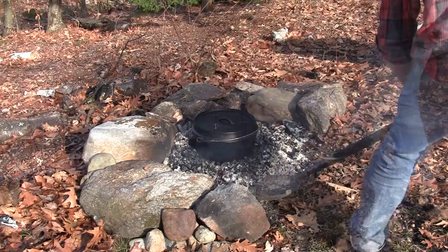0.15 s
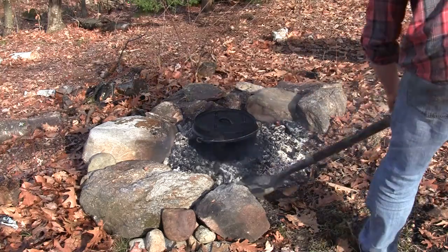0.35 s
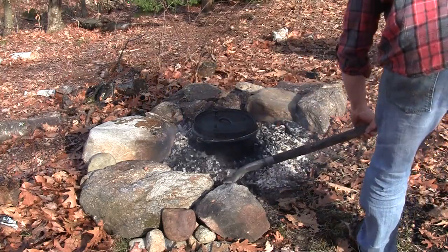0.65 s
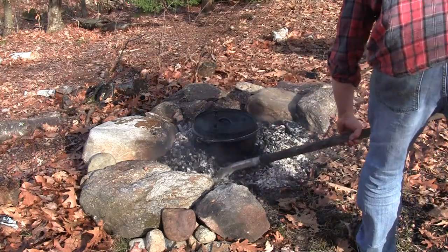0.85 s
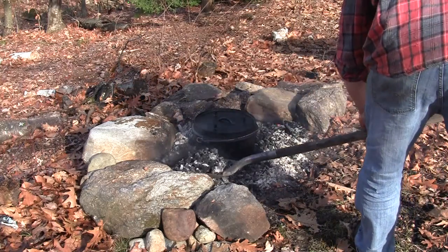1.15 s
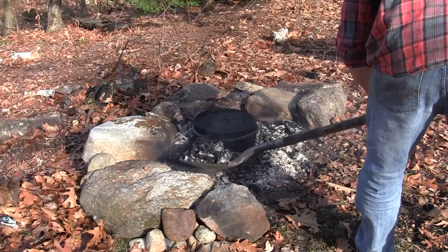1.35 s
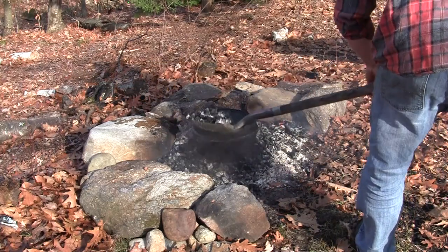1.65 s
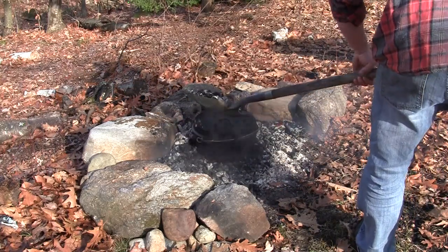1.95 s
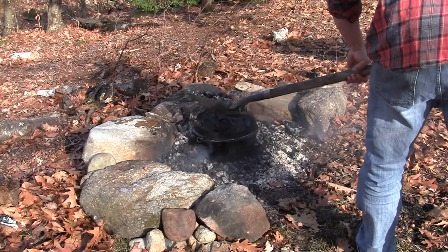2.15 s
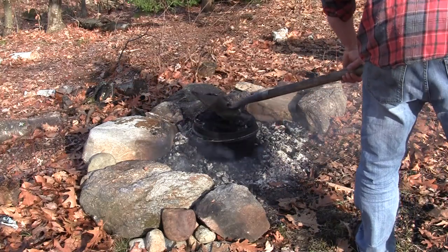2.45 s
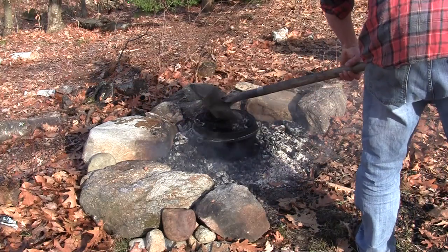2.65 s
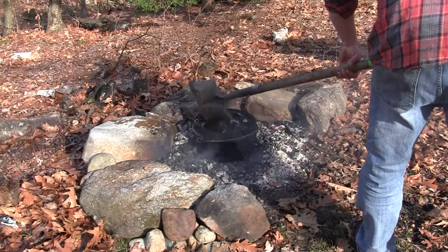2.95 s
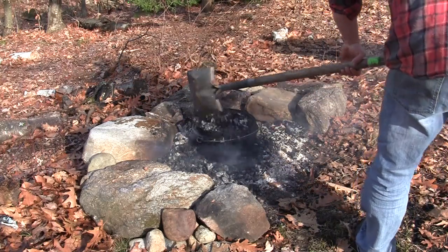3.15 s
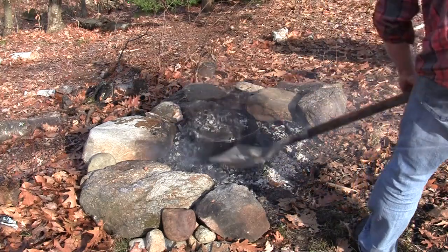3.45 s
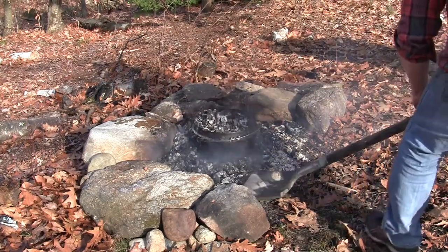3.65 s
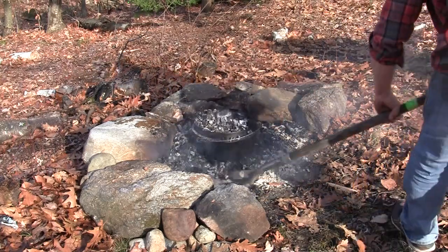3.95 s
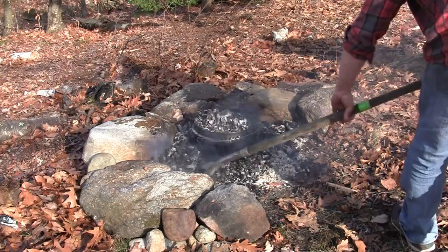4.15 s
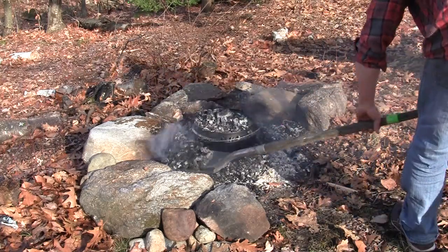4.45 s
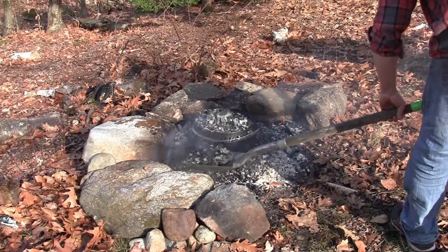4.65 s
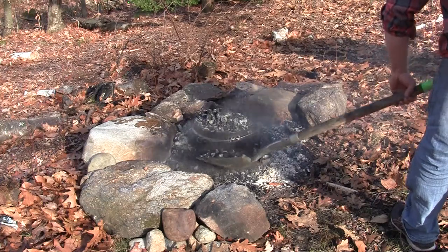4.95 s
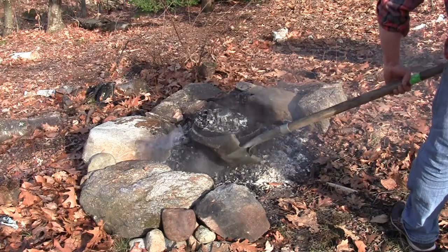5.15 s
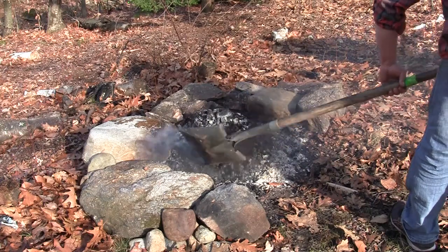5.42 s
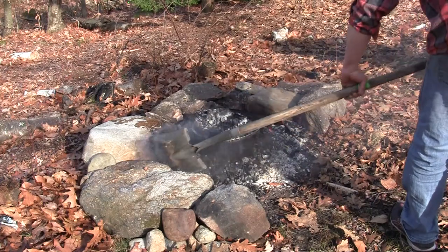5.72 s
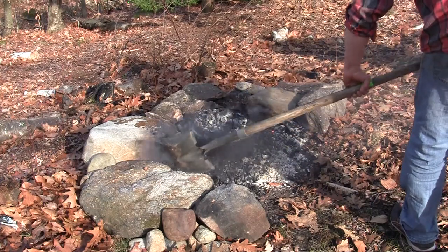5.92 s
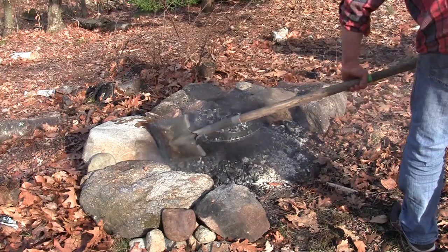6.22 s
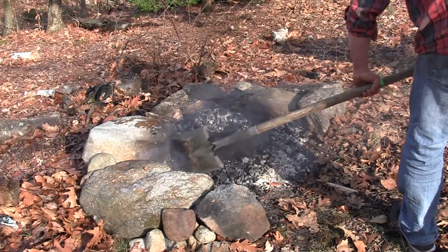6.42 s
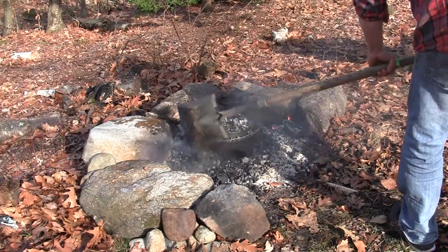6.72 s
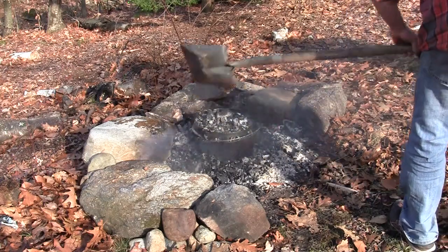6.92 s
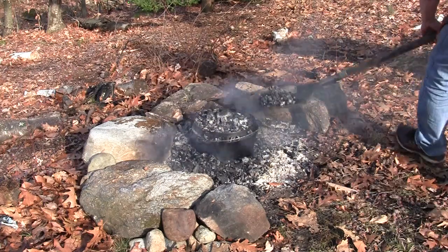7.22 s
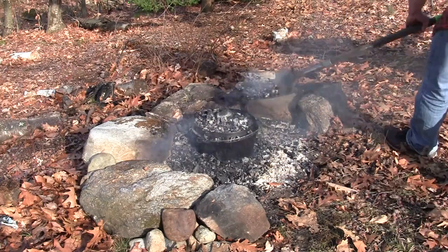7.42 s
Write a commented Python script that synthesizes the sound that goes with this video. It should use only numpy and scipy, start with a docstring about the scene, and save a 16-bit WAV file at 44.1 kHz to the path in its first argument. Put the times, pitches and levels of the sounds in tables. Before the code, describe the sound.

Close outdoor sound of shovelling embers: a brief leaf shuffle, gritty steel scrapes and taps, a quiet lift, then light iron-lid rings and a solid clank with a low thud. The shovel returns, rasping harder through brittle coals with dry snaps. Sharp ringing blows come in two groups near the end, grit trickles away, and boots rustle leaves. Sparse, short echoes and very soft air surround it.

```python
"""Shovelling ash and coals by a fire

A steel shovel scrapes through ash and coals outdoors and tips them onto a cast-iron lid; boots shuffle in leaves.
Grit is dense random clicks and chips, with separate bumps that ring the blade; knocks add a noise crack,
a low thud and decaying blade modes. Falling coals ring the lid modes, dry ticks are short noise bursts,
and sparse echoes surround them. Filtered noise makes the faint outdoor hush and a drone with one thud."""
import sys
import numpy as np
from scipy import signal
from scipy.fft import rfft, irfft, next_fast_len
from scipy.io import wavfile
from scipy.ndimage import uniform_filter1d

SR = 44100
rng = np.random.default_rng(int(sys.argv[2]) if len(sys.argv) > 2 else 0)


def store_pcm(level_fs):
    """Save levels as 16-bit WAV."""
    pcm = np.round(np.clip(level_fs, -1, 1) * 32767).astype(np.int16)
    wavfile.write(sys.argv[1], SR, np.atleast_2d(pcm).T)


N = 334278


def gain_of(db):
    """Decibels to amplitude factor."""
    return 10 ** (np.asarray(db) / 20)


def evened(x):
    """Scales to rms 1."""
    return x / np.sqrt(np.mean(x ** 2) + 1e-20)


def coloured(x, points):
    """Filters by a spectrum of (Hz, dB) points, interpolated over log frequency; rms 1."""
    f_hz, db = np.transpose(points)
    size = next_fast_len(x.shape[-1])
    bins_hz = np.fft.rfftfreq(size, 1 / SR)
    shape_db = np.interp(np.log(bins_hz + 1), np.log(f_hz), db)
    filtered = irfft(rfft(x, size) * gain_of(shape_db), size)
    return evened(filtered[..., :x.shape[-1]])


def bell_db(hz, octaves, per_octave_db):
    """Level falls with the square of the octaves from a centre above 1 kHz."""
    return -per_octave_db * (np.log2((hz + 1) / 1e3) - octaves) ** 2


def add(mix, start_s, sound):
    """Mixes a sound in at start_s."""
    part = mix[round(start_s * SR):][:len(sound)]
    part += sound[:len(part)]


def grains(per_s, spread_db, lumpy_db):
    """Random clicks of either sign, a few large, coming in clumps."""
    at = rng.integers(0, N, round(per_s * N / SR))
    size_db = spread_db * np.minimum(rng.exponential(1, len(at)), 5)
    size = gain_of(size_db) * rng.choice([-1., 1.], len(at))
    slow = rng.standard_normal(N // 50 + 1)
    clumps = evened(uniform_filter1d(uniform_filter1d(slow, size=7), size=7))
    return np.bincount(at, size * gain_of(lumpy_db * clumps[at // 50]), N)


def mode_bank(modes, damping=1, size=SR // 2):
    """One decaying complex rotation a mode; its real part is the sound; damping divides each t60."""
    hz, db, t60_s = np.transpose(modes)[:3, :, None]
    t = np.arange(size) / SR
    return gain_of(db - 60 * t * damping / t60_s) * np.exp(2j * np.pi * hz * t)


def struck(bank, weights_db, rise_s, turns):
    """All modes start at once, each at its own phase, and swell over the contact time."""
    ring = ((gain_of(weights_db) * np.exp(2j * np.pi * turns)) @ bank).real
    onset_rms = np.sqrt(np.mean(ring[:1000] ** 2))
    return ring / onset_rms * np.minimum(np.arange(len(ring)) / SR / rise_s, 1)


def burst(octaves, t60_s, rise_s, width_db, body=1):
    """Gritty noise round a colour, dull at the very top, shaped by a body; swells over the rise, then decays."""
    t, hz = np.arange(8192) / SR, np.fft.rfftfreq(8192, 1 / SR)
    noise, slow = rng.standard_normal((2, 8192))
    gritty = noise * gain_of(2.5 * evened(uniform_filter1d(slow, size=50)))
    shape = body * gain_of(bell_db(hz, octaves, width_db)) / (1 + (hz / 9000) ** 4)
    decay = gain_of(-60 * np.maximum(t - rise_s, 0) / t60_s)
    swell = np.minimum(t / rise_s, 1) ** 2
    return evened(irfft(rfft(gritty) * shape)) * decay * swell


def taps(rows, modes, width_db, rise_s):
    """Taps ring the modes nearest their centre until muted; phase runs on, so a tap feeds a ring already going."""
    out, bank = np.zeros(N), mode_bank(modes)
    hz, t = np.transpose(modes)[0], np.arange(SR // 2) / SR
    turns = rng.random(len(bank))
    for start_s, db, centre_hz, free_s in rows:
        muting_db = -400 * np.maximum(t - free_s, 0)
        weights_db = bell_db(hz, np.log2(centre_hz / 1e3), width_db)
        running_turns = turns + hz * round(start_s * SR) / SR
        ring = struck(bank, weights_db, rise_s, running_turns)
        add(out, start_s, gain_of(db + muting_db) * ring)
    return out


# Outdoor wash spectrum: f/Hz, relative density/dB
HUSH_SPECTRUM = [(15, 1), (60, -3), (150, 5), (550, -2), (1100, -8.5), (3000, -16.5), (8000, -19),
                 (16000, -24.5)]
HUSH_RMS_DB = -54
# Low drone over time, with a thud at 3.0 s: t/s, level/dB
DRONE_LEVELS = [(0, -68), (1.9, -64), (2.2, -55.5), (2.8, -57.5), (3.0, -42.5), (3.2, -60.5), (5, -56),
                (6.1, -67), (7.58, -58)]
# Drone spectrum: f/Hz, relative density/dB
DRONE_SPECTRUM = [(40, -33), (95, -2.5), (120, -3), (220, -37.5)]


def hush():
    """Distant outdoor wash, drone and its one thud: filtered noise, partly alike on both sides."""
    common, apart = rng.standard_normal((2, 1, N)), rng.standard_normal((2, 2, N))
    wash, low = common + .55 * apart
    drone_db = np.interp(np.arange(N) / SR, *np.transpose(DRONE_LEVELS))
    return gain_of(HUSH_RMS_DB) * coloured(wash, HUSH_SPECTRUM) + gain_of(drone_db) * coloured(low, DRONE_SPECTRUM)


def surroundings(x):
    """Stones, ground and trees scatter sparse, dull, decaying echoes, other ones to each side."""
    t = np.arange(8000) / SR
    signs = rng.choice([-1., 1.], (2, len(t)))
    echoes = signs * (rng.random((2, len(t))) < .05) * (t > .002)
    echoes = signal.lfilter([1], [1, -.3], echoes * gain_of(-60 * t / .13))  # one-pole dulling
    echoes = echoes / np.linalg.norm(echoes, axis=1, keepdims=True)
    return signal.oaconvolve(x[None], echoes, axes=1)[:, :N]


# Short dry ticks, snapping coals and twigs, and first contacts of blade knocks: t/s, level/dB, colour f/Hz
DRY_TICKS = [(0.292, -23, 5740), (.309, -21.5, 1020), (.408, -15, 2490), (0.67, -30, 2150),
             (1.33, -38, 9000), (1.62, -38.5, 8000), (1.679, -33.5, 7000), (1.803, -37, 4020),
             (3.179, -19.5, 1490), (3.215, -23, 3600), (3.27, -22, 4900), (3.283, -22.5, 3800),
             (3.399, -25, 1420), (3.517, -21.5, 3720), (3.757, -21.5, 1160), (4.605, -28, 1560),
             (4.721, -17.5, 1790), (5.029, -15, 2000), (5.352, -28, 600), (5.475, -13.5, 2320),
             (5.718, -29, 4200), (5.806, -13.5, 2500), (6.326, -12.5, 1500), (5.878, -15.5, 795),
             (7.36, -19, 6120)]


def dry_ticks(rise_s=0.00034, t60_s=0.0075):
    """Snapping coals and twigs, and first contacts of blade knocks: sharp noise bursts with no ring."""
    out = np.zeros(N)
    for start_s, db, colour_hz in DRY_TICKS:
        add(out, start_s, gain_of(db) * burst(np.log2(colour_hz / 1e3), t60_s, rise_s, width_db=2.5))
    return out


# Coals landing on the lid: t/s, ring level/dB, ring centre f/Hz, time until muting/s
LID_CLINKS = [(2.095, -36, 1600, .2), (2.363, -43, 1270, .12), (2.407, -39, 1500, .1),
              (2.495, -44.5, 1080, .06), (2.568, -39, 1080, 0.051), (2.657, -33, 2500, .14),
              (2.675, -57, 1150, .14), (2.922, -35, 1200, 0.083), (3.015, -27, 1560, .086)]
# Cast-iron lid modes: f/Hz, level/dB, t60/s
LID_MODES = [(699, -14, .4), (1104, 0, 1.4), (1523, -7, .25), (1567, -4, .8), (2121, 0, 1.0),
             (2778, -6, .12), (3564, 0, .2), (4300, 8, .3), (4835, 14, .5)]


def lid_clinks():
    """Falling coals ring the lid, mostly the modes near each centre."""
    return taps(LID_CLINKS, LID_MODES, width_db=19.0, rise_s=0.0023)


# Glancing touches: t/s, ring level/dB, ring centre f/Hz, time until muting/s
BLADE_GLANCES = [(.799, -30, 2350, .01), (1.006, -40.5, 2450, 0.0087), (1.15, -48.5, 2130, .07),
                 (3.713, -38, 1079, .25), (3.96, -37.5, 1079, 0.052), (5.1, -32, 2180, .02),
                 (5.113, -28, 4000, 0.0088), (5.405, -36, 2130, .1), (5.41, -40, 848, .14),
                 (5.459, -36, 2450, .012), (5.465, -33, 2130, 0.14), (5.477, -40, 1079, .1),
                 (5.814, -25, 1620, 0.044), (5.95, -38, 3150, 0.078), (5.962, -33, 4062, .05),
                 (5.964, -31, 6400, .05), (6.378, -28, 848, .09), (6.378, -25, 4825, .05)]
# Steel blade modes: f/Hz, level/dB, t60/s at damping 1, tip-strike weighting/dB
BLADE_MODES = [(848, -4, .5, 3), (1079, -10, .7, -6), (1620, -5, .24, 5), (1911, -5, .12, 4),
               (2216, -8, .5, -8), (2290, -10, .22, -3), (2350, -7, .12, -5), (2450, -6, .15, -2),
               (2730, -6, .16, 0), (2923, -14, .12, 1), (3150, -9, .4, 4), (3322, -8, .16, 1),
               (3585, -8, .2, -1), (3748, -8, .16, -3), (3910, -10, .3, -4), (4062, -10, .3, -1),
               (4287, -8, .2, 1), (4655, -12, .12, 1), (4825, -10, .2, 5), (5015, -13, .2, 1),
               (5400, -12, .09, -1), (5902, -15, .18, 1), (6302, -5, .1, 1), (6487, -8, .16, -1),
               (7181, -12, .15, 3)]


def blade_glances():
    """Glancing touches wake only a few neighbouring blade modes."""
    return taps(BLADE_GLANCES, BLADE_MODES, width_db=600, rise_s=0.0052)


def chips(count=14):
    """Brittle coals click at pitches of their own, a few cycles each."""
    out = np.zeros(N)
    for hz in np.geomspace(700, 9000, count):
        cycles = np.arange(round(8 * SR / hz)) * hz / SR
        chip = np.sin(2 * np.pi * cycles) * cycles * np.exp(-cycles / 1.13)
        chip = chip / np.linalg.norm(chip) * np.sqrt(hz)
        train = grains(per_s=120, spread_db=4.0, lumpy_db=2.5)
        out += signal.oaconvolve(train, chip)[:N]
    return evened(out)


# Movements below: start t/s, end t/s, crunch at start/dB, crunch at end/dB,
# rumble re crunch/dB, blade ring re crunch/dB
# Blade pushed through ash
BLADE_SCRAPES = [(.385, .625, -34, -37, -8.5, 3), (.64, .85, -48.5, -37, -8, -2.5),
                 (3.845, 3.91, -32.5, -31, -6, 2.5), (3.93, 4.265, -27.5, -25, -11.5, 0),
                 (5.11, 5.5, -41, -42, -6.5, 1)]
# Grit shaken loose by a blow
GRIT_SPILLS = [(2.085, 2.3, -41.5, -45.5, -14, -17), (2.92, 3.13, -32.5, -37.5, -19, -7),
               (5.727, 5.99, -37, -36, -7.5, -5.5), (6.332, 6.56, -25.5, -44.5, -16, -6.5)]
# Coals sliding and settling
COAL_SLIDES = [(.9, 1.42, -47.5, -57.5, -12, -8), (1.5, 1.98, -61.5, -56.5, -8, -22),
               (2.37, 2.53, -38.5, -45.5, -14.5, -14), (2.57, 2.65, -37, -37, -6, -25),
               (2.8, 2.9, -46.5, -43, -15, -6), (3.2, 3.7, -43.5, -42, -4, -19),
               (4.33, 4.66, -41, -36.5, -7.5, -28), (4.74, 5.08, -47.5, -49, 2, -21),
               (5.56, 5.71, -40.5, -45.5, -5, -25), (6.05, 6.28, -48, -63.5, -17, 1),
               (6.57, 6.92, -45.5, -63.5, -14, -11)]
# Boots in dry leaves
LEAF_STEPS = [(0, .33, -38, -47, -8, -7), (7.2, 7.53, -36, -34, -12, -31)]


def effort():
    """Movements swell, drift in level and fade; summed power gives crunch, rumble, fizz and ring gains."""
    kinds = (  # rows, swell dB/s, fade dB/s, fizz dB re crunch
        (BLADE_SCRAPES, 410, 570, -20),
        (GRIT_SPILLS, 3000, 400, -16.5),
        (COAL_SLIDES, 170, 105, -16.5),
        (LEAF_STEPS, 74, 340, -10),
    )
    t, power = np.arange(0, N + 64, 64) / SR, np.zeros((4, 1))
    for rows, swell, fade, fizz_db in kinds:
        for start_s, end_s, first_db, last_db, low_db, ring_db in rows:
            db = np.interp(t, [start_s, end_s], [first_db, last_db])
            db = db - swell * np.maximum(start_s - t, 0) - fade * np.maximum(t - end_s, 0)
            power = power + gain_of(db + np.array([[0], [low_db], [fizz_db], [ring_db]])) ** 2
    return [np.interp(np.arange(N) / SR, t, np.sqrt(p)) for p in power]


# Spectra of crunch, fizz and low rumble: f/Hz, relative density/dB
CRUNCH_SPECTRUM = [(290, -72), (500, 2), (1080, 1), (1410, 1.5), (2270, 2), (2990, -1.5), (3680, 3),
                   (8000, -5), (13000, -26.5), (19800, -82)]
FIZZ_SPECTRUM = [(4000, -6), (8000, -8.5), (12000, -4.5), (16000, -27)]
RUMBLE_SPECTRUM = [(70, -43), (140, -14), (270, -2.5), (430, -4), (1000, -28)]


def grit():
    """Crushed ash, coals and leaves: dense clicks and chips; separate bumps shake each strongly damped blade mode."""
    crunch, low, fizz, shake = effort()
    clicks = evened(grains(per_s=12000, spread_db=1.5, lumpy_db=2.0))
    rumble = grains(per_s=990, spread_db=1.5, lumpy_db=3.0)
    out = crunch * coloured(clicks + 0.52 * chips(), CRUNCH_SPECTRUM)
    out += fizz * coloured(clicks, FIZZ_SPECTRUM)
    out += low * coloured(rumble, RUMBLE_SPECTRUM)
    hz, tip_db = np.transpose(BLADE_MODES)[[0, 3]]
    rubbed_db = bell_db(hz, 1.28, 4.9) - 0.5 * tip_db  # rubbed near the heel, the middle modes answer most
    rings = gain_of(rubbed_db)[:, None] * mode_bank(BLADE_MODES, damping=5.5, size=6000).real
    for ring in rings / np.linalg.norm(rings):
        bumps = evened(grains(per_s=220, spread_db=2.5, lumpy_db=2.5))
        spot = evened(uniform_filter1d(rng.standard_normal(N // 256 + 2), size=9))  # the rubbed spot wanders
        wander = np.interp(np.arange(N) / 256, np.arange(len(spot)), spot)
        coupling = gain_of(4.9 * wander - 4.0)
        out += signal.oaconvolve(shake * bumps * coupling, ring)[:N]
    return out


# Blade knocks on coals, stones and lid: mid-contact t/s, crack level/dB, colour/octaves above 1 kHz,
# thud re crack/dB, ring re crack/dB, spot struck (heel 0, tip 1)
BLADE_KNOCKS = [(0.458, -22, 1.2, -19, -7, 0.27), (.72, -28, 0.5, -18, -4, 0.46),
                (0.756, -38, -1.5, -13, -12, .4), (.799, -24, 0.2, -11, -7, 0.36),
                (.823, -22, 0.06, -17.5, -16, .95), (1.006, -37.5, 1.1, -30, 0, 0.55),
                (1.993, -43, 1.5, -20, -1, 0.66), (2.028, -34.5, 0.93, -25, -4.5, 0.46),
                (2.081, -26.5, 2, -24, -4, 0.54), (2.187, -40, 2.5, -21, 4, 0.8),
                (2.277, -37.5, 3, -23, -0.5, 0.65), (2.407, -33.5, 3, -17, 0.5, 0.59),
                (2.567, -33.5, 0.5, -1.5, 4, 0.36), (2.608, -23.5, 0, -11, -12.5, .4),
                (2.921, -23.5, 1.3, -7, -6, 1), (2.995, -26.5, 2, -6, -0.5, 0.31),
                (3.01, -13, 0.65, -13.5, -9, 0.82), (3.066, -19.5, 1.1, -11.5, -5.5, 0.79),
                (3.148, -32.5, 2.5, -3, 0, 0.87), (3.32, -25.5, 1.5, -30, -32, 0.45),
                (3.711, -22, 1.5, -31, -9, .06), (4.445, -29, 0.7, -25, -12, .3),
                (4.545, -22.5, 1.5, -6.5, -6, 0.3), (4.896, -32.5, 1.5, -24, -6, 0.1),
                (5.107, -26, 2, -8, -12, 0.23), (5.24, -33, 1, -25, -1.5, 0.48),
                (5.462, -37.5, 0.4, -29, 6.5, 0.072), (5.726, -23.5, 1.1, -22, -2.5, 0.74),
                (5.811, -7.5, 1.5, -19, -11.5, 0.79), (5.912, -26.5, 3.5, -26, -2, 0.36),
                (5.946, -15, 2.5, -32, -6, 0.37), (5.964, -21, 1.5, -23, -10, 0.58),
                (5.986, -20, 1.65, -32, -9.5, 0.69), (6.329, -8.5, 2.5, -10.5, -11.5, 0.41),
                (6.371, -11, 1.7, -23, -3, 1), (6.447, -23.5, 1.5, -6, -2.5, 0.87),
                (6.553, -39, 2, -12, 2, 0.6), (6.644, -44, 2, -24, 2.5, 0.19),
                (6.49, -29, 4, -22, -10, 0.54), (7.02, -32.5, 0.2, -2.5, -23, .4),
                (7.043, -29, -1.5, -8, -27, .4), (7.471, -25.5, 3.5, -9.5, -28, .4)]
# Ash on the blade shortens its knock ring: t/s, added loss/(dB/s)
ASH_LOAD = [(1.1, 400), (2.0, 80), (2.9, 120), (3.3, 40), (6.0, 60)]


def knocks(rise_s=0.0064, crack_t60_s=0.055, thud_t60_s=0.1):
    """Each knock: a gritty crack, a low thud of the ground and the ring of the blade."""
    out, t = np.zeros(N), np.arange(SR // 2) / SR
    bank = mode_bank(BLADE_MODES, damping=0.97)
    hz, tip_db = np.transpose(BLADE_MODES)[[0, 3]]
    damped = mode_bank(BLADE_MODES, damping=4.7, size=8192).real.sum(0)
    pressed = 4.3 + evened(abs(rfft(damped, 8192)))  # blurred modes while in contact
    thud_shape = gain_of(-60 * t / thud_t60_s) * np.minimum(t / 0.0013, 1)
    for mid_s, db, octaves, thud_db, ring_db, spot in BLADE_KNOCKS:
        crack = burst(octaves, crack_t60_s, rise_s, width_db=1.5, body=pressed)
        thud = coloured(rng.standard_normal(len(t)), RUMBLE_SPECTRUM) * thud_shape
        loss_db = np.interp(mid_s, *np.transpose(ASH_LOAD)) * t
        ring_octaves = np.minimum(octaves + 0.28, 3.2)
        weights_db = bell_db(hz, ring_octaves, 3.06) + (2 * spot - 1) * tip_db
        ring = struck(bank, weights_db, rise_s, rng.random(len(bank)))
        start_s = mid_s - rise_s / 2
        add(out, start_s, gain_of(db) * crack)
        add(out, start_s, gain_of(db + thud_db) * thud + gain_of(db + ring_db - loss_db) * ring)
    return out


def scene():
    """Everything at the fire comes from near the middle, with echoes and hush around it."""
    fire = grit() + knocks() + dry_ticks() + lid_clinks() + blade_glances()
    direct = fire * gain_of([[.2], [-.2]])
    return direct + gain_of(-10.5) * surroundings(fire) + hush()


def record(dry):
    """The input stage rounds off the loudest blows by tanh; then a linear-phase low-pass limits the band."""
    soft = .95 * np.tanh(dry / .95)
    edge_hz = 15950
    lowpass = signal.firwin(511, edge_hz, window=("kaiser", 9), fs=SR)
    return signal.oaconvolve(soft, lowpass[None], "same", axes=1)


dry = scene()
out = record(dry)
store_pcm(out)
```